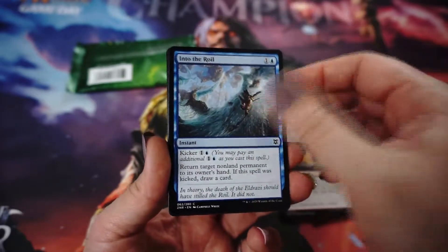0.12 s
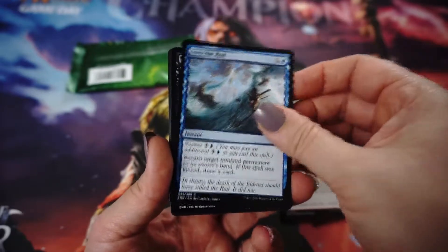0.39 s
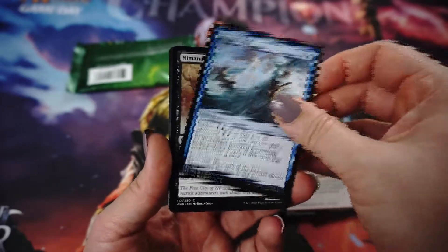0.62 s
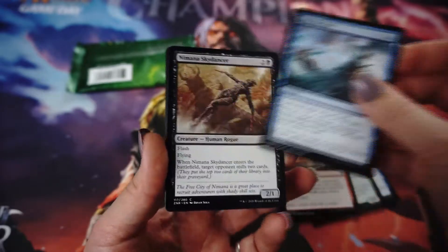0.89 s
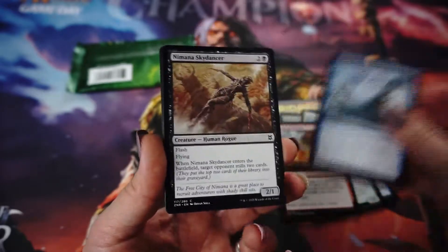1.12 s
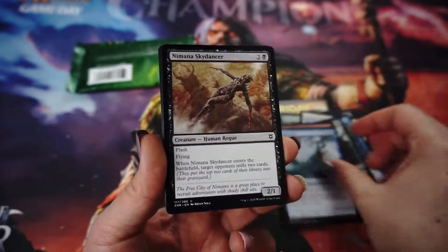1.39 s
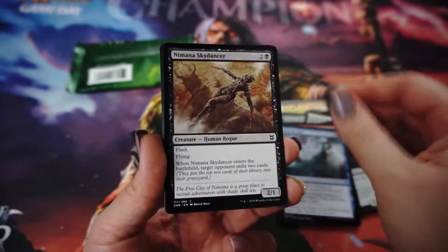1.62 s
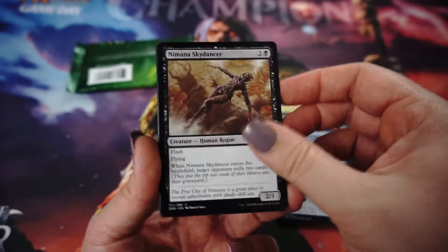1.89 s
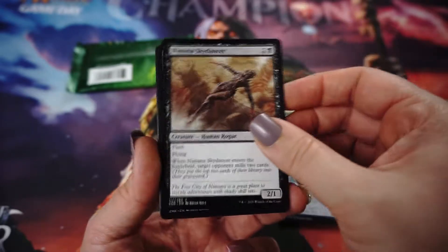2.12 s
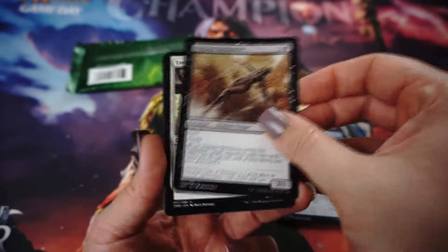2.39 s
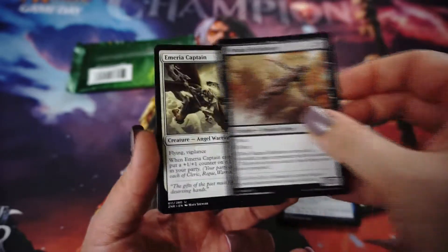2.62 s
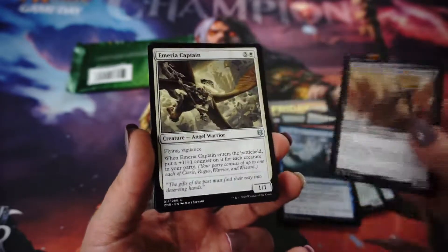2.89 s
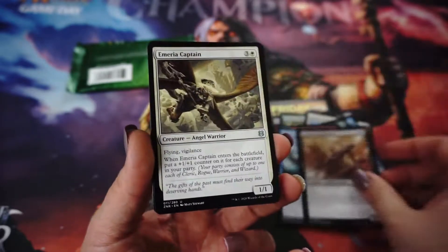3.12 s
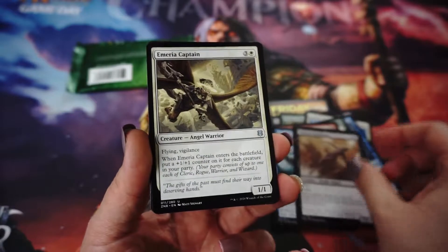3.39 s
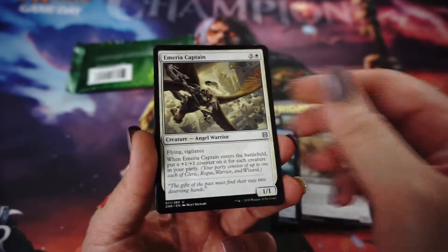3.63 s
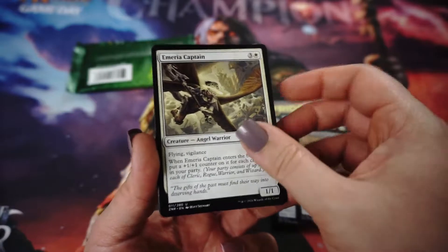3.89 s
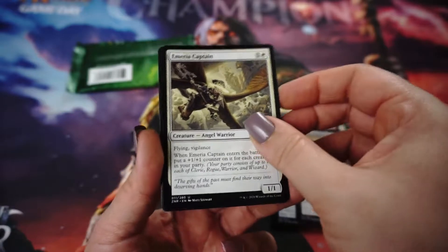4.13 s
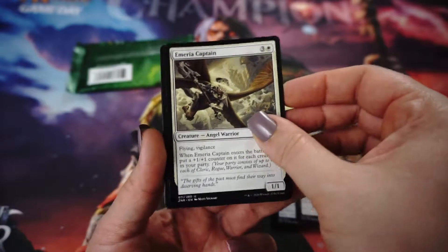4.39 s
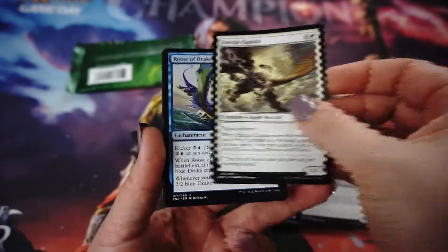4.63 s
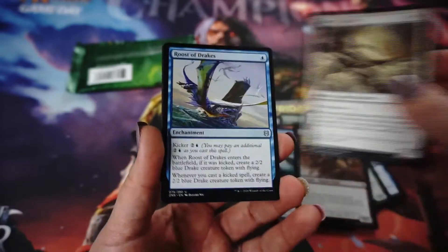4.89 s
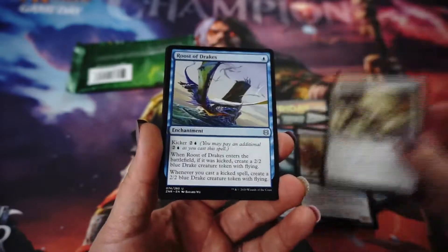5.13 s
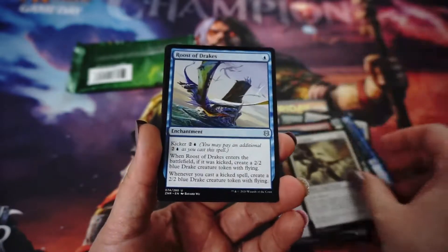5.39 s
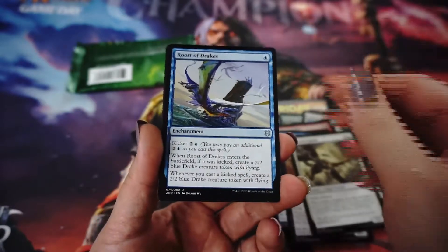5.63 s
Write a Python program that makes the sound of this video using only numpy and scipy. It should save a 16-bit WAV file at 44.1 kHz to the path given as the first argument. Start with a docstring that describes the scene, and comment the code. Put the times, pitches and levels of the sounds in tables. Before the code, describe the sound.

Close-up in a quiet room with faint steady hiss and soft hand rumble. Three times, a stiff card is drawn off a held stack: a grainy papery swish, a crisp snap with a short woody flick, then after a pause dry ticks and brief rubs as it lands on a pile. Dull soft thumps accompany the snaps; only a slight short room tail is heard.

```python
"""Close view of a quiet room: steady air noise and lumpy hand rumble throughout, dull decaying-sine thuds from 0.2 s.
Faint edge clicks (noise scrapes) also start at 0.2 s, short paper rubs (grainy noise) at 0.3 s.
Stiff cards slide off a held stack near 0.7, 2.4 and 4.5 s: level-curved grain noise, then edge snaps
that ring card modes; sharper clicks on a pile follow each, the last near 5.4 s.
The table top mirrors slides, snaps and clicks; the room adds a faint tail to them."""
import sys
import numpy as np
from scipy import signal
from scipy.fft import rfft, irfft, next_fast_len
from scipy.io import wavfile
from scipy.ndimage import uniform_filter1d, map_coordinates

SR = 44100
rng = np.random.default_rng(int(sys.argv[2]) if len(sys.argv) > 2 else 0)


def pcm_store(signal):
    """Save signal as 16-bit PCM."""
    levels = np.round(np.clip(np.atleast_2d(signal), -1, 1) * 32767)
    wavfile.write(sys.argv[1], SR, levels.astype(np.int16).T)


def gain_from_db(level_db):
    """Convert decibel levels to linear amplitude factors (20 dB per decade)."""
    decades = np.asarray(level_db, float) / 20
    return 10 ** decades


N = 254016

# spectra, relative: hz, density_db_per_hz
# room and microphone hiss
AIR_SPECTRUM = [(15, -47), (25, -15.5), (155, -8.5), (187, -6.5), (219, -8.5), (403, -10.5), (554, -13.5),
                (781, -18), (1870, -28.5), (2250, -25.5), (2860, -26.5), (12600, -30.5), (14000, -22.5)]
# hands shifting
RUMBLE_SPECTRUM = [(20, -8.5), (70, -4.5), (150, -8.5), (300, -14), (600, -29), (1200, -39.5)]
# scrape of an edge
EDGE_SPECTRUM = [(900, -15), (1500, -5), (2300, -1.5), (3000, 0.5), (4500, -4), (7000, -7.5), (13000, -16)]
# paper on paper
RUB_SPECTRUM = [(710, -23), (1200, -9.5), (1520, -9.5), (1760, -8.5), (2270, -0.5), (4470, -8.5),
                (6030, -4.5), (11300, -13.5), (12900, -12), (13600, -13.5), (14000, -42)]
# bending card
FLEX_SPECTRUM = [(300, -19.5), (600, 5), (1200, -4), (1700, -30.5), (3000, -26)]
# whole card flapping
FLUTTER_SPECTRUM = [(80, -17.5), (150, 4), (250, 6), (450, -6.5), (900, -46)]

# hands shifting: time_s, rumble_db
HAND_LEVELS = [(0.0, -63), (0.34, -62), (0.59, -61), (0.94, -64), (1.11, -62), (1.88, -63), (2.07, -59.5),
               (2.68, -59.5), (3.47, -64.5), (4.19, -59.5), (4.38, -57.5), (5.76, -64)]
# low pushes from wrists on the table and air squeezed under a card: start_s, peak_db, pitch_hz
THUDS = [(0.183, -52.5, 88.5), (0.367, -49.5, 84), (0.818, -32.5, 116), (0.868, -35, 62.4),
         (0.941, -44, 163), (1.057, -30, 158.4), (1.07, -28.5, 84.6), (1.417, -51.5, 51.1),
         (1.832, -46.5, 75.5), (2.017, -41, 78.6), (2.452, -50.5, 98), (2.563, -49, 66), (2.738, -47.5, 87),
         (2.883, -25, 92), (3.202, -40, 70.5), (3.27, -43.5, 146), (3.772, -43, 98), (3.875, -42, 49.4),
         (4.046, -49, 112.6), (4.202, -39, 114), (4.39, -46, 74), (4.433, -44.5, 80), (4.452, -42, 80.7),
         (4.5, -44, 90), (4.528, -37, 70), (4.893, -45, 177), (4.989, -25, 169), (5.008, -38, 75),
         (5.04, -47, 70.1), (5.296, -42, 128)]
# nominal modes of a flicked card, undamped: mode_hz, level_db, t60_s
CARD_MODES = [(249, 4.5, 0.021), (331.6, 0.5, 0.034), (438, -11.5, 0.059), (776.4, -11.5, 0.07),
              (970, 2.5, 0.018), (1147, -7.5, 0.024), (1425, 1, 0.018), (2255, -5.5, 0.01),
              (3040, -1.5, 0.011)]
# dry edge clicks, mostly on the pile, before the table:
# time_s, scrape_peak_db, bright_db (above 5 kHz), scrape_length_s
CLICKS = [(0.185, -53, -4, 0.0026), (0.357, -55, 3, .001), (1.32, -22, -2, 0.00088),
          (1.45, -22, 1.5, 0.0032), (1.466, -26.5, 10, 0.00066), (2.597, -38, -4, .0015),
          (2.609, -38, -17, 0.0033), (3.137, -24.5, 2.5, .0008), (3.233, -34.5, -5, 0.0027),
          (3.254, -28.5, -3, 0.0018), (3.2658, -15.5, 2, .0026), (3.275, -28, 4, 0.00056),
          (4.508, -55, 3, 0.001), (5.2986, -26.5, 3.5, 0.0007), (5.367, -42, -4, .0011),
          (5.393, -26, -2.5, 0.0051), (5.419, -29.5, 16, 0.0023), (5.429, -34, 14.5, 0.00055),
          (5.441, -38, 14, .0007)]
# edges snapping on the held stack, before the table:
# time_s, scrape_peak_db, bright_db (above 5 kHz), ring_db, slap_db (last two re scrape)
FLICKS = [(1.057, -21.5, -3.5, -8, -18), (1.069, -20.5, -11.5, -1, -7), (2.547, -34.5, 7, -7.5, -13.5),
          (2.8647, -15, -4, -2.5, -16), (2.887, -21.5, 4, -1, -1), (3.77, -43.5, 1, -7, 2),
          (3.809, -56.5, 8, 6.5, 8), (3.862, -52.5, 3, -4, 8), (3.8745, -39.5, -3, 4.5, 7.5),
          (4.2024, -46, 15, -4.5, -5), (4.53, -38.5, 17, -36.5, -11), (4.892, -17, -6, -34, -15),
          (4.987, -9, -12.5, -5.5, -5.5)]
# short rubs of thumb or card: start_s, length_s, first_db, last_db, treble_db (re hiss)
RUBS = [(0.286, 0.0067, -74, -70, -3), (0.423, 0.034, -77, -74, 5.5), (0.592, 0.033, -65.5, -67, -2.5),
        (1.033, 0.025, -66, -57, -1), (1.319, 0.069, -52, -71.5, 1.5), (1.4, 0.059, -62, -57, 2.5),
        (1.462, 0.036, -59, -80, -7), (1.97, .08, -71, -76, -5), (2.309, 0.042, -74.5, -79, 0.5),
        (3.064, 0.022, -69, -74, -6), (3.144, 0.026, -56.5, -71, -2.5), (3.178, 0.061, -59, -59, -4),
        (3.252, 0.011, -68, -44.5, 0), (3.274, 0.042, -69, -74, 5), (4.206, 0.03, -68, -66.5, 7),
        (4.385, 0.022, -68, -60.5, 1.5), (5.296, 0.036, -54, -68.5, -0.5), (5.355, 0.0436, -62.5, -54, -5),
        (5.423, 0.02, -58.5, -65, -4)]
# cards drawn off the stack, one curve each: time_s, hiss_db, treble_db, flex_db (last two re hiss)
DRAWS = [
    [(0.675, -75, 4, 6), (0.683, -73, -4, -4), (0.749, -57, 8.5, -4), (0.815, -49.5, 8, -24),
     (0.847, -56.5, 16.5, -10), (0.865, -56, 7.5, 3), (0.875, -61, -8, -4), (0.909, -59, -15, -8),
     (0.951, -52, 3, -29), (1.001, -51, 0, -18), (1.021, -67.5, 4, -12), (1.03, -67, 3, -8)],
    [(2.44, -89, -2, -10), (2.482, -60, 3.5, -10), (2.5, -57.5, -3, -11), (2.588, -59, -5, -5.5),
     (2.612, -47, -15, -30), (2.636, -57.5, 2, -7), (2.676, -50.5, -2, -16), (2.692, -53, 4.5, -12),
     (2.778, -42, -8, -12.5), (2.796, -44.5, -15, -14), (2.836, -40.5, -9, -24), (2.856, -47, -8, -14)],
    [(4.527, -76, 3, -11), (4.543, -64.5, 12, -7), (4.753, -51.5, -7, -18.5), (4.829, -54, -4, -11.5),
     (4.875, -45.5, 4.5, -15.5), (4.895, -30, -11, -6), (4.911, -46, 7, -16), (4.939, -45.5, 4, -15.5),
     (4.97, -69, -3, -5)],
]
# held card buckling under the thumb: time_s, flutter_db, flex_db, half_length_s (to 1/e)
BUCKLES = [(0.788, -47, -78, 0.045), (0.824, -34.5, -42, 0.01), (0.943, -52.5, -61, 0.0062),
           (2.469, -59, -71, 0.012), (4.532, -56, -66, 0.036), (4.897, -34, -55, 0.014)]
# room decay: hz, t60_s
ROOM_DECAY = [(200, 0.15), (2000, 0.23), (10000, 0.28)]

AIR_DB, ROOM_DB = -64, -18
THUD_T60_S = 0.064
FLICK_SCRAPE_S = 0.0017
FLICK_CREEP, CLICK_CREEP = 0.33, 0.13  # creep amplitude re scrape envelope
CLICK_RING_DB, CLICK_SLAP_DB = -35, -24  # re scrape; the pile damps the card
# contacts softer than FREE_DB leave a finger on the card: t60 loses this share per dB
FREE_DB, DAMP_PER_DB = -21, 0.5
FLEX_DB, FLUTTER_DB = -18, -22.5  # re hiss: flex in short rubs, flutter in any slide
RUB_IN_S, RUB_OUT_S = 0.0056, 0.022  # per 20 dB
DRIFT_HZ_PER_S = 3500
BAND_LIMIT_HZ = 13600


def unit(x):
    """Scale to rms 1."""
    return x / np.sqrt(np.mean(x ** 2) + 1e-20)


def along(points, hz):
    """Read (hz, value) points on a log-frequency axis."""
    point_hz, value = np.transpose(points)
    return np.interp(np.log(hz + 1), np.log(point_hz + 1), value)


def filtered(x, response):
    """Multiply the spectrum of x by a complex response of frequency."""
    size = next_fast_len(x.shape[-1] + SR // 4)
    spectrum = rfft(x, size) * response(np.fft.rfftfreq(size, 1 / SR))
    return irfft(spectrum, size)[..., :x.shape[-1]]


def coloured(x, spectrum):
    """Shape x by a spectrum, rms 1."""
    return unit(filtered(x, lambda hz: gain_from_db(along(spectrum, hz))))


def wobble(rate_hz):
    """Smooth random curve, rate_hz knots a second."""
    knots = rng.standard_normal(int(N * rate_hz / SR) + 4)
    return map_coordinates(knots, [np.arange(N) * rate_hz / SR])


def treble(hz):
    """Gain 0-1 passing sound above about 5 kHz."""
    return 1 / (1 + (5000 / (hz + 1)) ** 4)


def add(track, start_s, sound):
    """Mix a sound into the track in place."""
    part = track[round(start_s * SR):][:len(sound)]
    part += sound[:len(part)]


def air():
    """Room and microphone hiss: coloured noise whose level wanders slowly."""
    return gain_from_db(AIR_DB + 0.78 * wobble(3.1)) * coloured(rng.standard_normal(N), AIR_SPECTRUM)


def hands():
    """Soft pushes of a cycle or two, suction first, over a lumpy rumble."""
    out = np.zeros(N)
    t = np.arange(SR // 5) / SR
    for start_s, peak_db, pitch_hz in THUDS:
        envelope = gain_from_db(-60 * t / THUD_T60_S) * (1 - np.exp(-t * pitch_hz / 0.25))
        push = -np.sin(2 * np.pi * pitch_hz * t) * envelope
        add(out, start_s, gain_from_db(peak_db) * push / np.abs(push).max())
    time_s, rumble_db = np.transpose(HAND_LEVELS)
    lumps = unit(gain_from_db(3.4 * wobble(22)) * coloured(rng.standard_normal(N), RUMBLE_SPECTRUM))
    return out + gain_from_db(np.interp(np.arange(N) / SR, time_s, rumble_db)) * lumps


def snaps():
    """An edge creeps for a few ms, lets go in a short scrape, and the scrape rings card modes at new strengths."""
    out = np.zeros(N)
    lead_s = 0.02
    t = np.arange(SR // 6) / SR
    late = t - lead_s
    contacts = [(*row, FLICK_SCRAPE_S, FLICK_CREEP) for row in FLICKS]
    contacts += [(time_s, peak_db, bright_db, CLICK_RING_DB, CLICK_SLAP_DB, length_s, CLICK_CREEP)
                 for time_s, peak_db, bright_db, length_s in CLICKS]
    for time_s, peak_db, bright_db, ring_db, slap_db, length_s, creep_share in contacts:
        length_s = max(length_s, 0.0005)
        creep = creep_share * np.exp(np.where(late < 0, late / (3.3 * length_s), -late / 0.0041))
        # a long scrape swells, a short one ticks
        envelope = creep + np.exp(-((late - 0.7 * length_s) / length_s) ** 2)
        burst = rng.standard_normal(len(t)) * envelope
        scrape = filtered(burst, lambda hz: gain_from_db(along(EDGE_SPECTRUM, hz))
                          * (1 + (gain_from_db(bright_db) - 1) * treble(hz)))

        free = np.clip(1 + DAMP_PER_DB * (peak_db - FREE_DB), 0.3, 1)
        low, high = np.zeros(len(t)), np.zeros(len(t))
        for mode_hz, level_db, t60_s in CARD_MODES:
            decay = gain_from_db(level_db + rng.normal(0, 3.4) - 60 * t / (t60_s * free))
            mode = decay * np.sin(2 * np.pi * mode_hz * rng.normal(1, 0.02) * t)
            if mode_hz < 870:
                low += mode
            else:
                high += mode
        catches = burst * gain_from_db(4.5 * rng.standard_normal(len(t)))  # a few hard ones dominate
        ring = signal.fftconvolve(high, catches)[:len(t)]
        # the face lands at one moment
        slap = -np.pad(low * (1 - np.exp(-t / 0.0046)), (round(lead_s * SR), 0))[:len(t)]

        parts = [(0, scrape), (ring_db, ring), (slap_db, slap)]
        contact = sum(gain_from_db(level_db) * v / np.abs(v).max() for level_db, v in parts)
        add(out, time_s - lead_s, gain_from_db(peak_db) * contact)
    return out


def patchy(x, depth_db):
    """Narrow resonances come, climb and go as the touching area of the cards changes."""
    hz, t, z = signal.stft(x, SR, nperseg=1024)
    field = uniform_filter1d(rng.standard_normal(z.shape), size=5, axis=0)
    field = uniform_filter1d(field, size=5, axis=1)
    # resonances climb as the touching area shrinks
    climb_bins = np.round(DRIFT_HZ_PER_S * t / hz[1]).astype(int)
    rows = (np.arange(len(hz))[:, None] - climb_bins) % len(hz)
    field = np.take_along_axis(field, rows, axis=0)
    return signal.istft(z * gain_from_db(depth_db * unit(field)), nperseg=1024)[1][:N]


def slides():
    """Paper fibres catch in tiny uneven grains; the pressure shivers as the card sticks and slips."""
    t = np.arange(N) / SR
    gain = np.zeros((4, N))  # hiss, treble, flex, flutter
    for start_s, length_s, first_db, last_db, treble_db in RUBS:
        ends = np.maximum((start_s - t) / RUB_IN_S, (t - start_s - length_s) / RUB_OUT_S)
        glide_db = np.interp(t, [start_s, start_s + length_s], [first_db, last_db])
        level = gain_from_db(glide_db - 20 * np.maximum(0, ends))
        gain += level * gain_from_db([[0], [treble_db], [FLEX_DB], [FLUTTER_DB]])
    for draw in DRAWS:
        time_s, hiss_db, treble_db, flex_db = np.transpose(draw)
        inside = np.clip(np.minimum(t - time_s[0], time_s[-1] - t) / 0.006 + 0.5, 0, 1)
        relative_db = (0, treble_db, flex_db, FLUTTER_DB)
        gain += inside * gain_from_db([np.interp(t, time_s, hiss_db + rel_db) for rel_db in relative_db])
    for time_s, flutter_db, flex_db, half_length_s in BUCKLES:
        gain[2:] += gain_from_db([[flex_db], [flutter_db]]) * np.exp(-((t - time_s) / half_length_s) ** 2)

    shiver = gain_from_db(1.46 * wobble(45) + wobble(160))
    grains = rng.standard_normal(N) * gain_from_db(2.95 * np.minimum(rng.exponential(size=N), 6))
    grains = patchy(grains, depth_db=2.5) * shiver
    rub = coloured(grains, RUB_SPECTRUM)
    top = filtered(rub, treble)
    flex = coloured(grains, FLEX_SPECTRUM)
    flutter = coloured(grains, FLUTTER_SPECTRUM)
    return np.sum(gain * [unit(rub - top), unit(top), flex, flutter], axis=0)


def table(x):
    """The table top returns a duller copy 0.847 ms later, cutting dips near 600 and 1700 Hz."""
    return filtered(x, lambda hz: 1 + 0.21 * np.exp(-2j * np.pi * hz * 0.000847) / (1 + (hz / 3000) ** 2))


def room(x):
    """Each frequency of the tail dies at its own speed; the tail is new for every third of a second."""
    out = np.zeros(N)
    step = SR // 3
    for start in range(0, N, step):
        hz, t, z = signal.stft(rng.standard_normal(step), SR, nperseg=256)
        decay = gain_from_db(-60 * t / along(ROOM_DECAY, hz)[:, None])
        tail = signal.istft(z * decay, SR, nperseg=256)[1]
        tail = tail / np.linalg.norm(tail)
        add(out, start / SR + 0.004, signal.fftconvolve(x[start:start + step], tail))
    return out


def scene():
    """Still air, hands on the table, and cards over it with their room tail."""
    cards = table(snaps() + slides())
    return (air() + hands() + cards + gain_from_db(ROOM_DB) * room(cards))[None]


def roll_off(x):
    """The treble ends steeply here."""
    return signal.sosfilt(signal.butter(12, 14410, fs=SR, output="sos"), x)


def record(dry):
    """The recorder's response falls off a 40 dB step at its band limit."""
    def step(hz):
        return gain_from_db(-40 / (1 + np.exp(np.clip((BAND_LIMIT_HZ - hz) / 90, -50, 50))))
    mix = filtered(dry, step)
    return roll_off(mix)


dry = scene()
out = record(dry)
pcm_store(out)
```